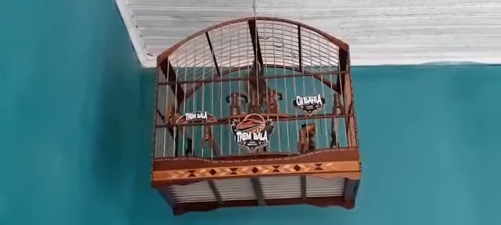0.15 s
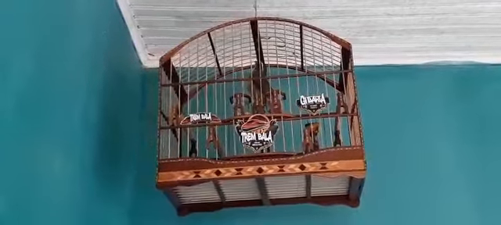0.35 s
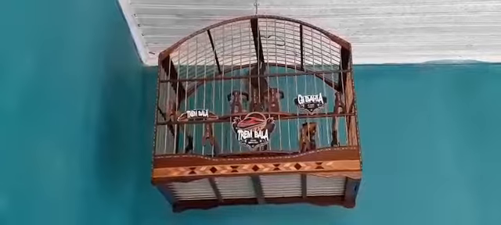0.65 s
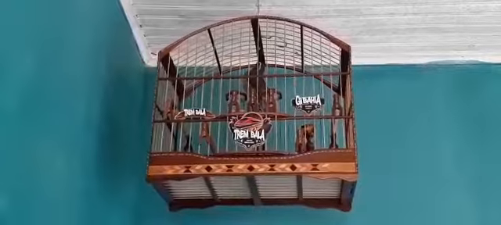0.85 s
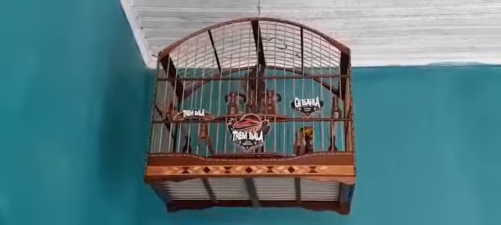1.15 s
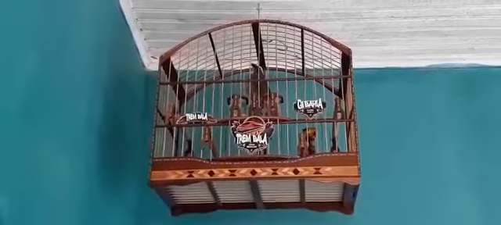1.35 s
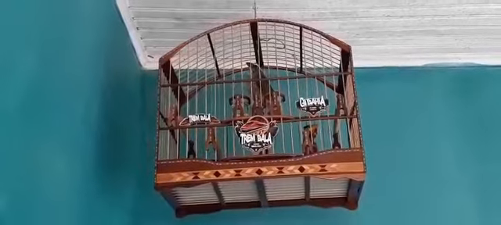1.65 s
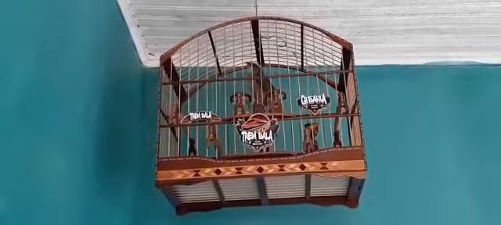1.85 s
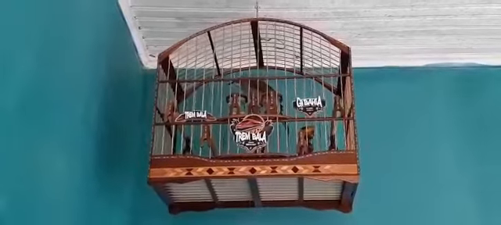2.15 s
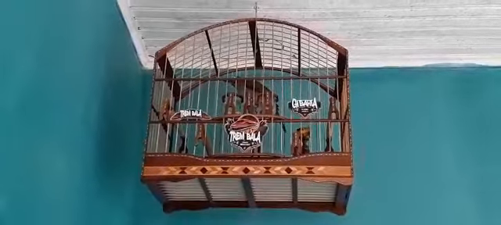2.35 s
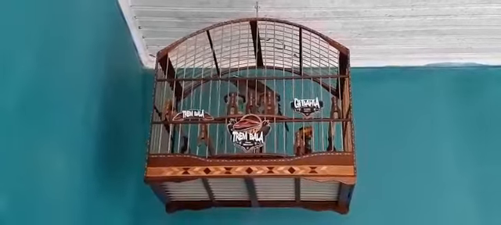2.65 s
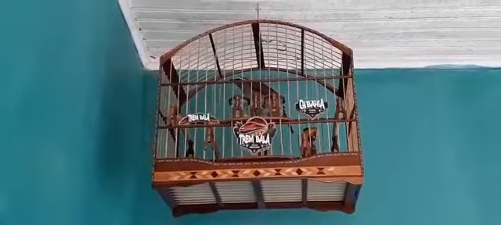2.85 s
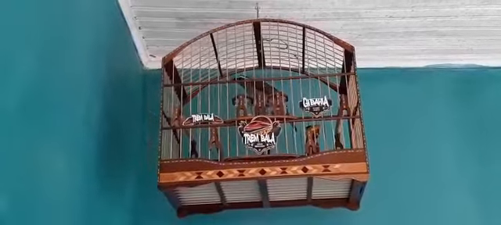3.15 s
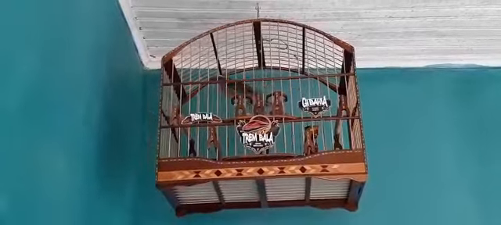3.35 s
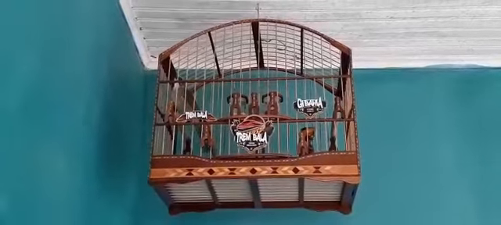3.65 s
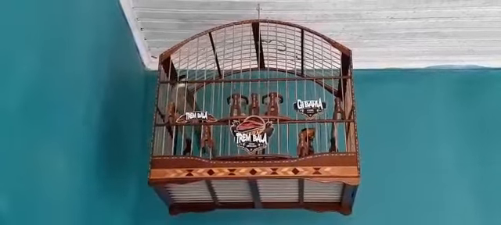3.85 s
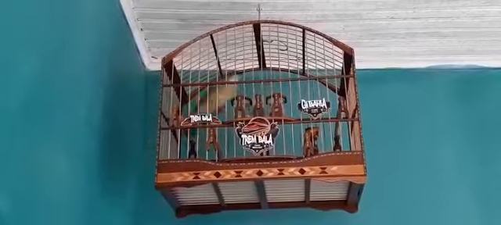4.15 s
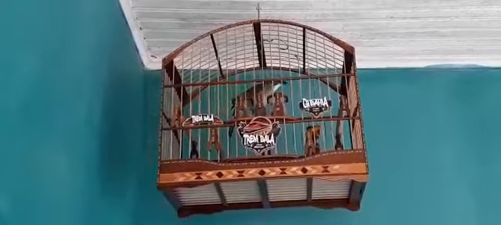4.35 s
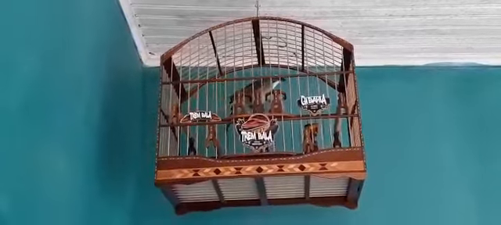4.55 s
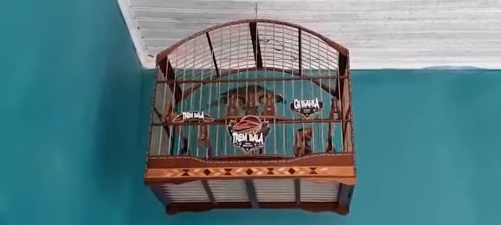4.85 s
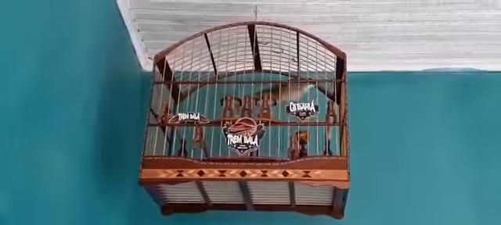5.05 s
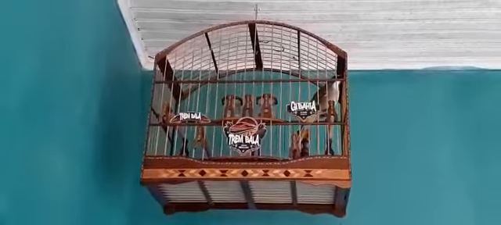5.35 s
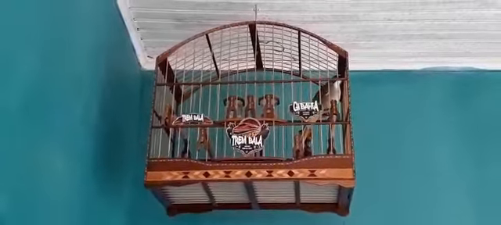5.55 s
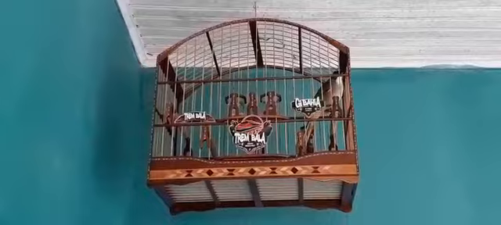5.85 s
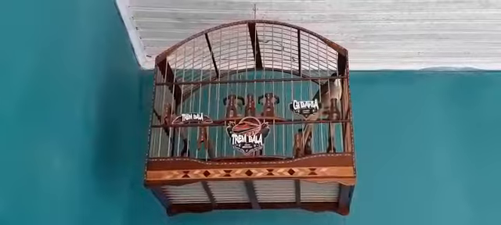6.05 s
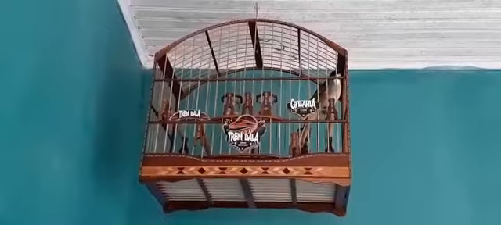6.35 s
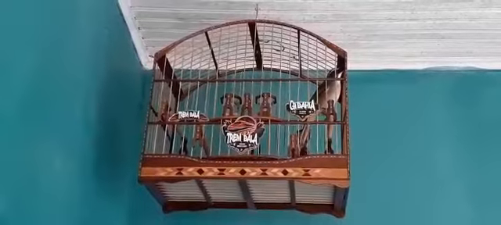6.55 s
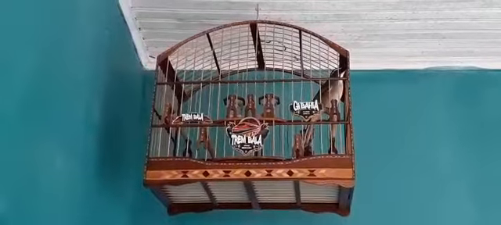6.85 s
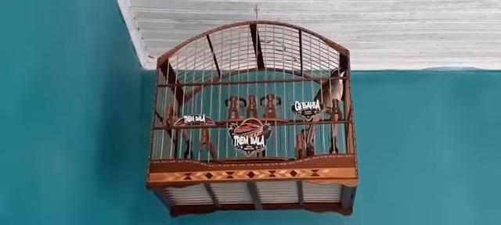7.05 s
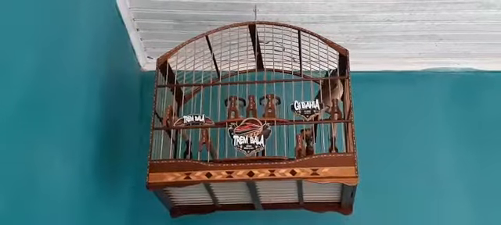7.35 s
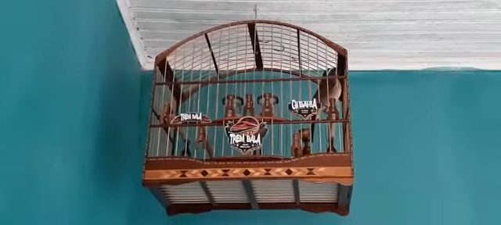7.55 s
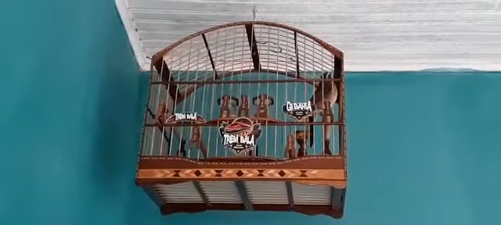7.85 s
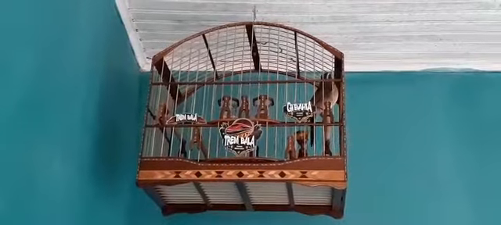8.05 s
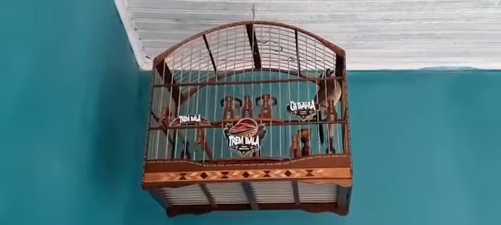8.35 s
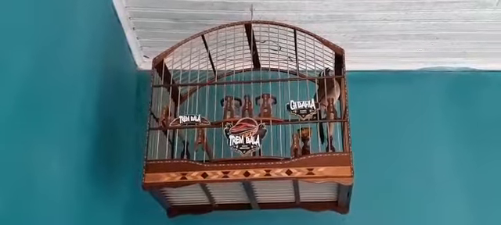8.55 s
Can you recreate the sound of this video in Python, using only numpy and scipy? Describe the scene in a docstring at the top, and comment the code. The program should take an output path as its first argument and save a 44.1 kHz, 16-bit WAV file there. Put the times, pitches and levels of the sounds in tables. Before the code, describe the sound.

In a hard, echoing room, a caged songbird is heard close up in stereo, already mid-whistle at the start. A low arched note at 0.15 s and a loud downward slur at 0.4 lead to a long upward whistle from 0.7 to 1.2, swelling and ringing away. Small birds then chip, pip and churr faintly, with weak low hoots far behind. Traffic wash and a distant engine hum swell around 2 to 3 s. From 2.9 to 5.2 a farther whistler gives falling glides, some raspy; light claw ticks sound at 3.6 and 4.2. The near bird returns at 5.1 with a raspy slur, two loud steep falls at 5.4 and 5.8, and a rising close from 6.1 to 6.6. Traffic sinks, leaving echo, soft hum and barely audible wire ring. A third phrase starts at 7.8 with a falling slur, a high held whistle at 8.2 and a low note cut off at the end.

```python
"""A caged saltator whistles loud slurred phrases in a hard, echoing room; low hoots lie far behind.
It opens mid-whistle and closes its phrase on a rise; small birds then twitter, traffic and an engine swell.
A farther whistler answers with falling glides, some rasped, while feet tick on the cage.
A second phrase follows; traffic and hum sink, the cage wires ring faintly, and a third phrase ends it.
Whistles are phase-driven tones with a throat band and beak overtones; the background is coloured noise."""
import sys
import numpy as np
from scipy import signal
from scipy.fft import rfft, irfft
from scipy.io import wavfile
from scipy.ndimage import uniform_filter1d, minimum_filter1d

SR = 44100
rng = np.random.default_rng(int(sys.argv[2]) if len(sys.argv) > 2 else 0)


def materialize(psi):
    """Save the field psi as 16-bit PCM at rate SR to the path in sys.argv[1].

    A 1-D psi becomes a single channel; in a 2-D psi each row is a channel.
    """
    bounded = np.clip(np.atleast_2d(psi).T, -1, 1)
    quanta = np.round(bounded * 32767).astype(np.int16)
    wavfile.write(sys.argv[1], SR, quanta)


N = 383669
LEAD_SAMPLES = SR // 4  # song before time zero
PORT_LAG_SAMPLES = 17  # straight sound, left port after right
EDGE_HZ = 15700  # upper band limit

# Still air spectrum: (frequency [Hz], relative density [dB])
AIR_SPECTRUM = [(25, -22), (60, 2.5), (260, -0.5), (600, -7), (800, -11), (1200, -29), (2800, -20),
                (4000, -6.5), (5000, -13), (6500, -19), (9000, -38), (15000, -40.5)]
AIR_LEVEL_DB = -57.5
# Traffic swell: (time [s], level [dB])
TRAFFIC_LEVEL = [(0, -62), (1.3, -62.5), (2.2, -57.5), (2.85, -46), (4.8, -49), (7.2, -64.5), (8.7, -63.5)]
# Traffic spectrum: (frequency [Hz], relative density [dB])
TRAFFIC_SPECTRUM = [(25, -25), (55, 2.5), (130, 12), (200, -5.5), (270, 5.5), (400, 1), (750, -2),
                    (1500, -5), (3000, -9), (7000, -17.5), (14000, -52)]
# Far engine drawing near and slowly leaving: (time [s], level [dB])
ENGINE_LEVEL = [(0, -59), (1.8, -56.5), (2.7, -50.5), (4.5, -49), (8.7, -54)]
# Engine resonances: (frequency [Hz], width at half amplitude [Hz], relative level [dB])
ENGINE_MODES = [(59.6, 18, -4.5), (90.56, 5.6, 3), (111.4, 16, -5.5)]
# Left-right correlation of the background: (frequency [Hz], correlation [-1 to 1])
EAR_CORRELATION = [(50, 0.95), (150, 0.79), (300, 0.88), (600, 0.43), (1500, 0), (8000, 0.13)]
# Left port response over right: (frequency [Hz], difference [dB])
PORT_LEAN = [(50, 7.5), (130, 6.5), (280, 0), (600, 2.5), (2000, -2), (3000, 0), (5000, 2), (8000, 7),
             (12000, 0.5)]
# Room decay time: (frequency [Hz], T60 [s])
ROOM_DECAY = [(1000, 0.74), (2500, 0.85), (4000, 0.77), (7000, 0.7), (11000, 0.64), (16000, 0.82)]

# Faint far hoots: (time [s], length [s], pitch [Hz], level [dB])
HOOT_CALLS = [(0.272, 0.12, 1016, -56.5), (1.266, 0.175, 1007, -52.5), (1.43, .29, 494, -58),
              (2.751, 0.195, 985, -57), (4.403, 0.41, 292, -55), (5.902, .55, 787, -67),
              (7.429, 0.11, 562, -62), (7.967, 0.39, 671.5, -65)]
HOOT_GLIDE, HOOT_RASP = .96, 0.27  # end pitch / start pitch, rasp 0-1
# Small birds, four kinds. Columns of each table: (time [s], start pitch [Hz], level [dB])
# Constants of each kind: length [s], end pitch / start pitch, rasp 0-1
# Thin, nearly level pips: (time [s], start pitch [Hz], level [dB])
PIP_CALLS = [(1.54, 6260, -46), (1.82, 6380, -51), (3.08, 6050, -47), (3.91, 6340, -45),
             (4.45, 5900, -42.5), (4.585, 5990, -45), (4.93, 6000, -48), (5.24, 6125, -42),
             (6.3, 6050, -41.5)]
PIP_S, PIP_GLIDE, PIP_RASP = 0.05, 0.95, 0.11
# Longer, higher seets: (time [s], start pitch [Hz], level [dB])
SEET_CALLS = [(2.15, 8150, -54.5), (3.6, 7560, -43), (4.3, 8320, -53), (5.78, 8300, -51),
              (6.96, 7080, -53.5)]
SEET_S, SEET_GLIDE, SEET_RASP = 0.086, 1.012, 0.318
# Rasping, falling churrs: (time [s], start pitch [Hz], level [dB])
CHURR_CALLS = [(1.35, 4130, -49), (1.64, 5680, -47.5), (1.85, 5240, -48.5), (1.98, 6050, -48),
               (2.35, 6440, -45), (2.44, 5420, -45), (2.77, 5740, -48), (3.43, 5670, -41.5),
               (3.62, 5710, -46.5), (3.95, 5550, -45), (4.53, 4400, -40.5), (5.23, 5560, -42.5),
               (5.95, 3950, -37), (5.97, 6370, -40.5), (6.53, 4680, -43), (6.57, 3730, -47.5),
               (7.31, 5040, -55.5), (7.5, 4650, -65)]
CHURR_S, CHURR_GLIDE, CHURR_RASP = 0.087, .81, .9
# Clear falling whistles: (time [s], start pitch [Hz], level [dB])
SLUR_CALLS = [(-.03, 6580, -49.5), (6.09, 6755, -43)]
SLUR_S, SLUR_GLIDE, SLUR_RASP = 0.24, 0.7, 0.13
# Farther whistler: (time [s], length [s], start pitch [Hz], end pitch [Hz], level [dB], rasp [0-1])
ANSWER_CALLS = [(2.85, 0.14, 3200, 3100, -50, 0.61), (2.92, 0.14, 3080, 2386, -52.5, 0.95),
                (3.35, 0.27, 2914, 2333, -40, 0.27), (3.8, 0.27, 2260, 1920, -44, 0.73),
                (4.16, 0.25, 2965, 2067, -40, 0.96), (4.62, 0.17, 3326, 2710, -48.5, 0),
                (5.04, 0.18, 2303, 2160, -35, 0.8)]

# Feet on the cage: (time [s], tick before its band filter [dB], wire ring [dB])
CAGE_TAPS = [(3.553, -52, -81), (4.226, -43, -74), (6.84, -72, -58), (7.32, -81, -67)]
# Cage wire modes: (frequency [Hz], relative level [dB], T60 [s])
WIRE_MODES = [(2640, -0.5, 0.54), (3050, -3.5, 0.86), (3488, 0, 0.94), (3460, -11.5, .9)]

# Overtone response of throat and beak: (frequency [Hz], gain [dB])
BEAK_RESPONSE = [(3000, 1), (4200, -9), (5600, -8), (7000, -4.5), (8500, -1.5), (10300, -0.5), (12000, 0),
                 (14300, -4.5), (16000, -22)]
# Saltator, four note kinds. Columns of each table:
# (time [s], length [s], pitch the glide leaves [Hz], glide [share of pitch], level [dB], fade [dB],
#  overtones [dB], rasp [0-1], straight sound as the head turns [dB], left over right [dB])
# High held whistles that sag late; the first starts before time zero (columns above)
HIGH_ARCH_NOTES = [(-.2, .225, 2864, .125, -12, 15.5, -37, 0.01, -1.5, 5),
                   (8.212, .22, 2847, 0.11, -10, 12, -34.5, 0.05, -5.5, 0.5)]
# Low whistles, scooped up, then bent down (columns above)
LOW_ARCH_NOTES = [(.143, .19, 2104, .2, -16, 15, -32, 0.025, -6, 2.5),
                  (8.547, .2, 2090, 0.171, -16.5, 12.4, -35, 0.0043, -1, 1.8)]
# Loud downward slurs (columns above)
FALL_NOTES = [(.426, .21, 3479, .365, -11.5, 7, -32.5, 0.15, -3, 5),
              (5.08, .255, 2822, .28, -17, 6.2, -38.5, .8, -9, -3),
              (5.448, 0.27, 3720, .435, -13.5, 13.6, -35.5, 0.15, -11, -0.5),
              (5.772, .29, 3714, .475, -12.5, 27.7, -37, 0.17, -15, -3),
              (7.817, 0.23, 2479, .22, -13, 10.2, -35.5, .5, -3, 2.5)]
# Long upward slurs that swell and close the phrase (columns above)
RISE_NOTES = [(.725, .465, 1399, .82, -18.5, 8.8, -31, 0.019, -5.5, 3.5),
              (6.1, .545, 1459, .615, -22.5, 22, -36, 0.052, -10.5, -1)]


def amp(db):
    """Decibels to amplitude."""
    return 10 ** (np.asarray(db) / 20)


def unit_rms(x):
    """Scale to unit RMS."""
    return x / np.sqrt(np.mean(x ** 2) + 1e-20)


def read(points, hz):
    """Table value at hz, linear over log frequency."""
    f, value = np.transpose(points)
    return np.interp(np.log(hz + 1), np.log(f + 1), value)


def add(mix, start_s, sound):
    """Add a sound to a track that starts LEAD_SAMPLES early."""
    first = max(LEAD_SAMPLES + round(start_s * SR), 0)
    part = mix[..., first:][..., :sound.shape[-1]]
    part += sound[..., :part.shape[-1]]


def wander(count, rate_hz):
    """Smooth random drift, unit RMS over one second, with a Gaussian spectral roll-off at rate_hz."""
    hz = np.fft.rfftfreq(SR, 1 / SR)
    spectrum = rfft(rng.standard_normal(SR)) * np.exp(-(hz / rate_hz) ** 2)
    return unit_rms(irfft(spectrum, SR))[:count]


def panned(x, lean_db):
    """Straight sound reaches the left port late; positive lean favours the left."""
    left = np.pad(x, (PORT_LAG_SAMPLES, 0))[:len(x)]
    return np.array([left, x]) * amp([[lean_db / 2], [-lean_db / 2]])


def room(x, build_s):
    """Dense reflections of random sign build up, then die away band by band."""
    spacing = 16  # samples per reflection
    count = SR // spacing
    taps = np.zeros((2, SR))
    at = np.arange(count) * spacing + rng.integers(0, spacing, (2, count))
    np.put_along_axis(taps, at, rng.choice([-1., 1.], at.shape), 1)
    hz, t, bands = signal.stft(taps, SR, nperseg=256)
    decay = amp(-60 * t / read(ROOM_DECAY, hz)[:, None])
    bands = bands * decay * (1 - np.exp(-t / build_s))
    tail = signal.istft(bands, SR, nperseg=256)[1]
    tail = tail / np.linalg.norm(tail, axis=1)[:, None]  # unit energy per ear
    return signal.fftconvolve(x[None], tail, axes=1)[:, :len(x)]


def noise(colour):
    """Unit-RMS stereo noise of a given colour; the ears correlate band by band."""
    hz = np.fft.rfftfreq(N, 1 / SR)
    a, b = rfft(rng.standard_normal((2, N)))
    same = np.clip(read(EAR_CORRELATION, hz), -1, 1)
    right = same * a + np.sqrt(1 - same ** 2) * b
    return unit_rms(irfft(np.array([a, right]) * colour(hz), N))


def still_air():
    """Steady coloured noise."""
    return amp(AIR_LEVEL_DB) * noise(lambda hz: amp(read(AIR_SPECTRUM, hz)))


def traffic():
    """Coloured noise wash that swells and fades."""
    level_db = np.interp(np.arange(N) / SR, *np.transpose(TRAFFIC_LEVEL))
    return amp(level_db) * noise(lambda hz: amp(read(TRAFFIC_SPECTRUM, hz)))


def engine():
    """Lumpy hum of a far engine: noise through narrow resonances."""
    def resonances(hz):
        return sum(amp(db) / (1 + (2 * (hz - f) / width) ** 2) for f, width, db in ENGINE_MODES)
    level_db = np.interp(np.arange(N) / SR, *np.transpose(ENGINE_LEVEL))
    return amp(level_db) * noise(resonances)


def syrinx(pitch_hz, rasp, buzz_hz, swing, jitter):
    """Whistling membrane; rasp adds an uneven flutter of pitch and strength. Gives phase, strength."""
    count = len(pitch_hz)
    flutter_hz = buzz_hz * (1 + 0.18 * wander(count, 73))
    flutter = np.sin(2 * np.pi * np.cumsum(flutter_hz) / SR)
    drift = 0.0027 * wander(count, 98)
    shake = rasp * (swing * flutter + jitter * wander(count, 250))
    hz = pitch_hz * (1 + drift + shake)
    strength = unit_rms(1 + np.clip(rasp, 0, 1) * flutter)
    return 2 * np.pi * np.cumsum(hz) / SR, np.sqrt(2) * strength


def far_calls(rows, octave_db, straight_db, swing, jitter):
    """Short glides with a faint octave, as room sound plus a straight share."""
    sung = np.zeros(LEAD_SAMPLES + N)
    for start_s, length_s, from_hz, to_hz, db, rasp in rows:
        count = int(length_s * SR)
        pitch_hz = np.geomspace(from_hz, to_hz, count)
        phase, strength = syrinx(pitch_hz, rasp, buzz_hz=108.94, swing=swing, jitter=jitter)
        tone = np.sin(phase) + amp(octave_db) * np.sin(2 * phase)
        add(sung, start_s, amp(db) * strength * tone * signal.windows.tukey(count, .6))
    return room(sung, build_s=0.007) + panned(amp(straight_db) * sung, 0)


def hoots():
    """Far low calls that droop a little."""
    rows = [(s, length_s, hz, hz * HOOT_GLIDE, db, HOOT_RASP) for s, length_s, hz, db in HOOT_CALLS]
    return far_calls(rows, octave_db=-23.5, straight_db=-1.5, swing=.03, jitter=0.12)


def chatter(level_db=-54, low_hz=3900, high_hz=6300, from_s=0.83, until_s=6.3, count=190):
    """Faint chips of small birds: glides at random times between random pitches."""
    rows = []
    for k, (when, length, start, end, size) in enumerate(rng.random((count, 5))):
        start_s = from_s + (until_s - from_s) * (k + when) / count
        length_s = 0.022 + 0.042 * length
        start_hz = low_hz + (high_hz - low_hz) * start
        end_hz = low_hz + (high_hz - low_hz) * end
        rows.append((start_s, length_s, start_hz, end_hz, level_db + 8 * (size - .5), .25))
    return far_calls(rows, octave_db=-24, straight_db=-24, swing=0.013, jitter=0.059)


def twitters():
    """Clear calls of small birds; each kind has its own length, glide and rasp."""
    kinds = [(PIP_CALLS, PIP_S, PIP_GLIDE, PIP_RASP), (SEET_CALLS, SEET_S, SEET_GLIDE, SEET_RASP),
             (CHURR_CALLS, CHURR_S, CHURR_GLIDE, CHURR_RASP), (SLUR_CALLS, SLUR_S, SLUR_GLIDE, SLUR_RASP)]
    rows = [(start_s, length_s, hz, hz * glide, db, rasp)
            for calls, length_s, glide, rasp in kinds for start_s, hz, db in calls]
    return far_calls(rows, octave_db=-23.5, straight_db=-6.5, swing=0.025, jitter=0.084)


def answers():
    """Farther whistler: falling glides, some rasped, mostly room sound."""
    return far_calls(ANSWER_CALLS, octave_db=-46, straight_db=-10.5, swing=0.0061, jitter=0.0505)


def cage_taps(decay_s=0.0061, room_db=-3, swell_s=0.02):
    """Claws land on wood: a short dry noise tick, plus a faint ring of the cage wires at its own level."""
    knocks, t = np.zeros(LEAD_SAMPLES + N), np.arange(SR) / SR
    band = signal.butter(1, [1500, 12000], "bandpass", fs=SR, output="sos")
    ring = sum(amp(db - 60 * t / t60_s) * np.sin(2 * np.pi * hz * t) for hz, db, t60_s in WIRE_MODES)
    ring = ring * (1 - np.exp(-t / swell_s))  # the frame passes the knock on to the wires
    for start_s, tick_db, ring_db in CAGE_TAPS:
        tick = signal.sosfilt(band, rng.standard_normal(len(t))) * np.exp(-t / decay_s)
        add(knocks, start_s, amp(tick_db) * tick + amp(ring_db) * ring)
    return knocks + amp(room_db) * room(knocks, build_s=0.0082)


def near_walls(x, bounce_db, spread_s):
    """Straight sound plus six early bounces per ear off the wall and ceiling around the cage."""
    out = x.copy()
    for ear, source in zip(out, x):
        delays_s = rng.uniform(spread_s / 10, spread_s, size=6)
        signs = rng.choice([-1, 1], size=6)
        for delay_s, sign in zip(delays_s, signs):
            lag = int(delay_s * SR) + 1
            ear[lag:] += sign * amp(bounce_db) * source[:-lag]
    return out


def throat(phase, strength, pitch_hz, reach_hz):
    """Throat tuned to the gliding pitch; passes only sidebands within reach of it."""
    carrier = np.exp(2j * np.pi * np.cumsum(pitch_hz) / SR)
    band = signal.butter(4, reach_hz, fs=SR, output="sos")
    baseband = strength * np.exp(1j * phase) / carrier
    return (carrier * signal.sosfiltfilt(band, baseband)).imag


def overtones(phase, pitch_hz, odd_db=-11, fall_db=3, low_hz=2000, high_hz=2800, waver_db=3):
    """Multiples of the whistle, coloured by the beak; high notes favour the even ones."""
    register = np.interp(pitch_hz, [low_hz, high_hz], [0, 1])
    # each overtone wavers in strength
    ripple_db = waver_db * np.tanh([wander(len(pitch_hz), 25) for _ in range(9)])
    out = np.zeros(len(pitch_hz))
    for k in range(2, 9):
        db = read(BEAK_RESPONSE, k * pitch_hz) + odd_db * register * (k % 2)
        db = db - fall_db * max(k - 6, 0) + ripple_db[k]
        out += amp(db) * (k * pitch_hz < SR / 2) * np.sin(k * phase)
    return out


def effort(t, fade_db, attack_s, crest, swell_db, swell_bend=1.52):
    """Note force: soft attack, swell to the crest (share of length), quickening fade."""
    u, crest = t / t[-1], np.clip(crest, .05, .95)
    before = np.maximum(1 - u / crest, 0)
    after = np.maximum((u - crest) / (1 - crest), 0)
    attack = np.minimum(t / attack_s, 1) ** 2
    return attack * amp(-swell_db * before ** swell_bend - fade_db * after ** 2)


def high_arch(t, hz, glide, fade_db, scoop=0.14, scoop_s=0.01253, lateness=5):
    """Snaps up to its pitch, holds it and sags late. Gives pitch, force."""
    pitch_hz = hz * (1 - scoop * np.exp(-t / scoop_s) - glide * (t / t[-1]) ** lateness)
    return pitch_hz, effort(t, fade_db, attack_s=0.062, crest=0.73, swell_db=5.0)


def low_arch(t, hz, glide, fade_db, scoop=0.58, scoop_s=0.012, lateness=3):
    """Deep scoop and early sag: a round arch. Gives pitch, force."""
    pitch_hz = hz * (1 - scoop * np.exp(-t / scoop_s) - glide * (t / t[-1]) ** lateness)
    return pitch_hz, effort(t, fade_db, attack_s=0.039, crest=0.47, swell_db=9.5)


def fall(t, hz, glide, fade_db, ease=1.85, shoulder=1.47):
    """Tips over a short shoulder, slides fast, then ever more slowly. Gives pitch, force."""
    done = np.expm1(-ease * (t / t[-1]) ** shoulder) / np.expm1(-ease)
    return hz * (1 - glide * done), effort(t, fade_db, attack_s=0.053, crest=0.39, swell_db=1.0)


def rise(t, hz, glide, fade_db, scoop=0.32, scoop_s=.038, top=.9, bend=1.55):
    """Scoop, then a quickening, swelling climb that tips over near the end. Gives pitch, force."""
    climbed = (1 - abs(1 - t / t[-1] / top)) ** bend
    pitch_hz = hz * (1 - scoop * np.exp(-t / scoop_s) + glide * climbed)
    return pitch_hz, effort(t, fade_db, attack_s=0.053, crest=0.77, swell_db=24)


def song():
    """Yields notes: start, pitch, force, overtones dB, rasp, straight dB, left-right dB."""
    kinds = [(high_arch, HIGH_ARCH_NOTES), (low_arch, LOW_ARCH_NOTES), (fall, FALL_NOTES), (rise, RISE_NOTES)]
    for shape, rows in kinds:
        for start_s, length_s, hz, glide, db, fade_db, *delivery in rows:
            t = np.arange(0, length_s, 1 / SR)
            pitch_hz, force = shape(t, hz, glide, fade_db)
            yield start_s, pitch_hz, amp(db) * force * signal.windows.tukey(len(t), .06), *delivery


def saltator(room_db=-3.5, beam_db=2.0, mellow_db=7):
    """Slurred whistles, purer as each goes on; head turns set the straight share, the beak beams overtones."""
    sung, straight = np.zeros(LEAD_SAMPLES + N), np.zeros((2, LEAD_SAMPLES + N))
    for start_s, pitch_hz, force, overtones_db, rasp, straight_db, lean_db in song():
        phase, strength = syrinx(pitch_hz, rasp, buzz_hz=132.6, swing=0.016, jitter=0.042)
        whistle = force * throat(phase, strength, pitch_hz, reach_hz=295)
        bright_db = overtones_db + mellow_db * np.linspace(.5, -.5, len(pitch_hz))
        edge = force * strength * amp(bright_db) * overtones(phase, pitch_hz)
        add(sung, start_s, whistle + edge)
        beamed = (whistle + amp(beam_db) * edge) * amp(straight_db)
        add(straight, start_s, panned(beamed, lean_db))
    near = near_walls(straight, bounce_db=-8.5, spread_s=.018)
    return near + amp(room_db) * room(sung, build_s=0.012)


def scene():
    """Birds and cage in their room, over the background."""
    background = still_air() + traffic() + engine()
    indoors = hoots() + chatter() + twitters() + answers() + cage_taps() + saltator()
    return background + indoors[:, LEAD_SAMPLES:]


def limiter(x, ceiling):
    """Gain turns down smoothly around peaks above the ceiling, both channels alike."""
    allowed = np.minimum(1, ceiling / (abs(x).max(axis=0) + 1e-9))
    return x * uniform_filter1d(minimum_filter1d(allowed, size=401), size=401)


def record(dry):
    """Two microphone ports of unequal colour, a peak limiter, then the band limit."""
    lean_db = read(PORT_LEAN, np.fft.rfftfreq(2 * N, 1 / SR))
    ports = irfft(rfft(dry, 2 * N) * amp([lean_db / 2, -lean_db / 2]))[:, :N]
    held = limiter(ports, ceiling=.98)
    lowpass = signal.firwin(511, EDGE_HZ, window=("kaiser", 9), fs=SR)
    return signal.oaconvolve(held, lowpass[None], "same")


dry = scene()
out = record(dry)
materialize(out)
```